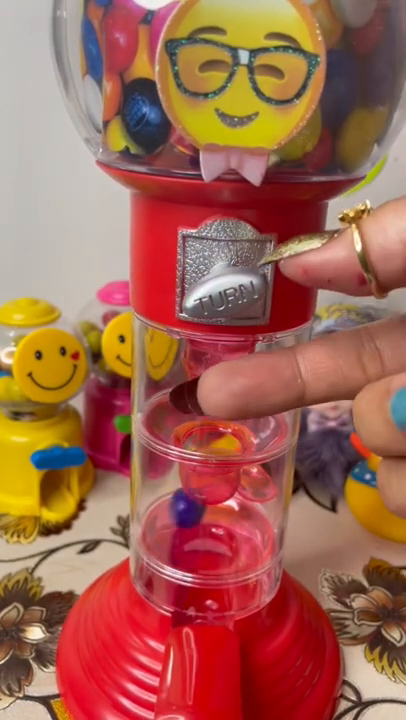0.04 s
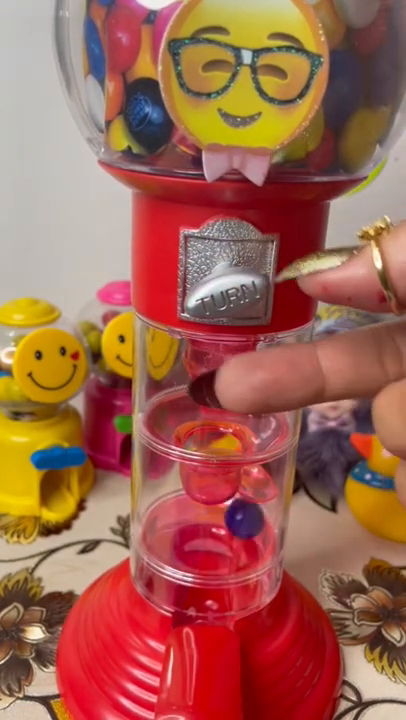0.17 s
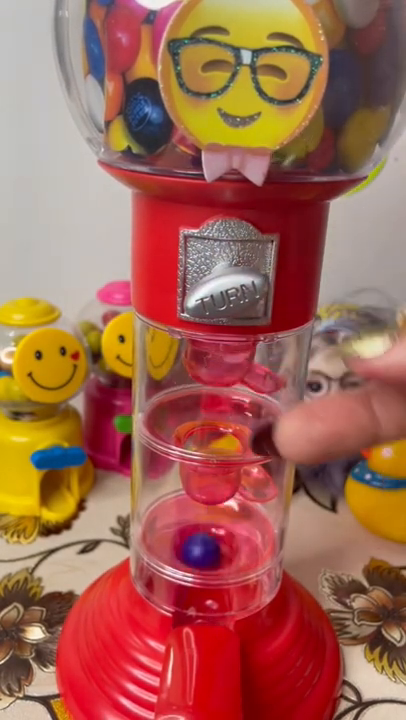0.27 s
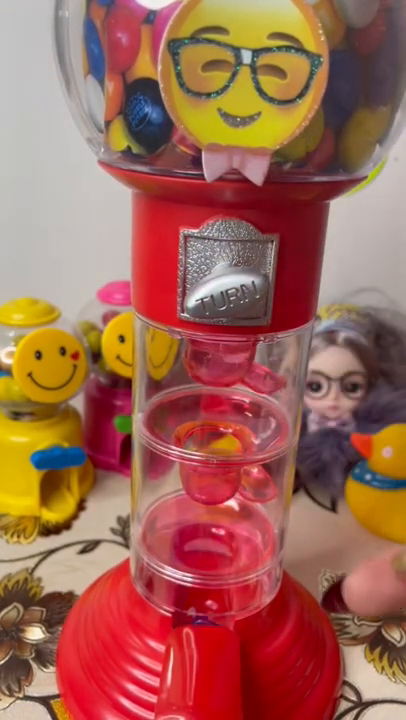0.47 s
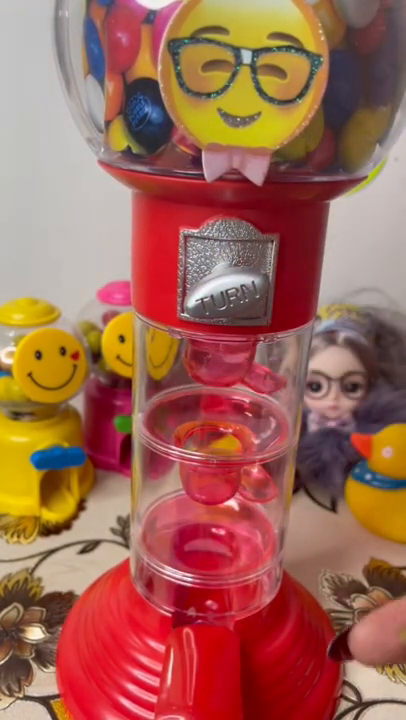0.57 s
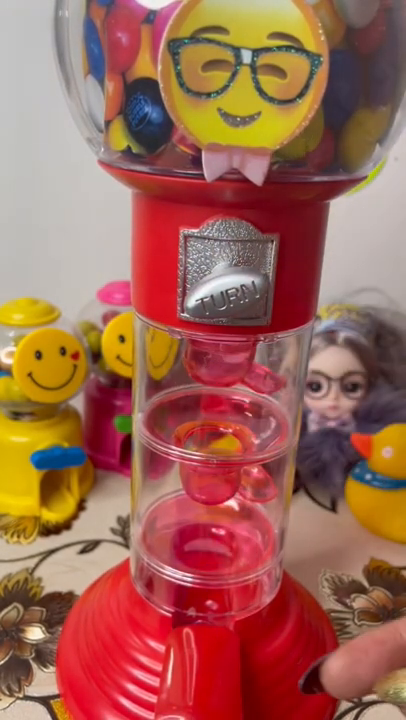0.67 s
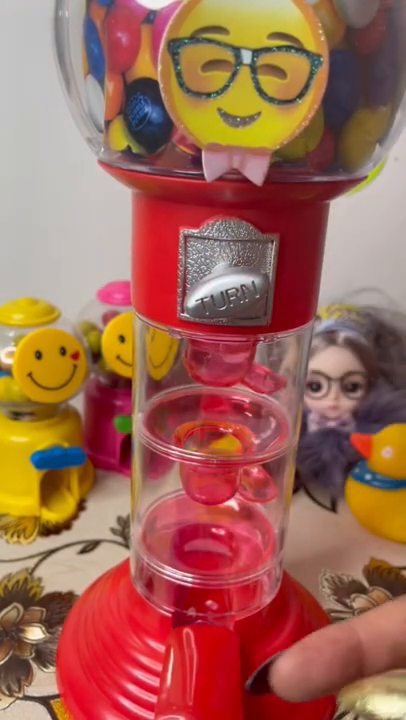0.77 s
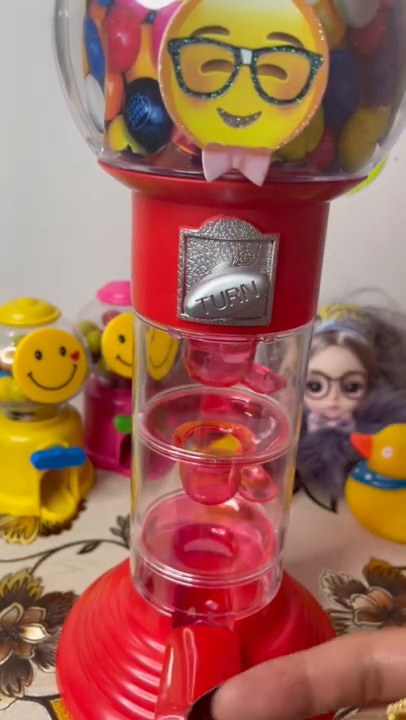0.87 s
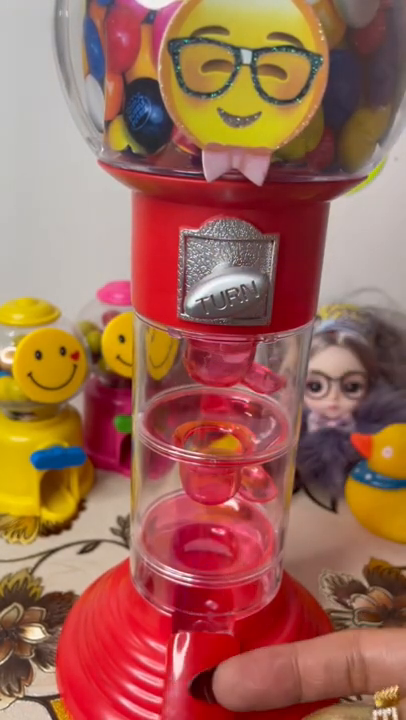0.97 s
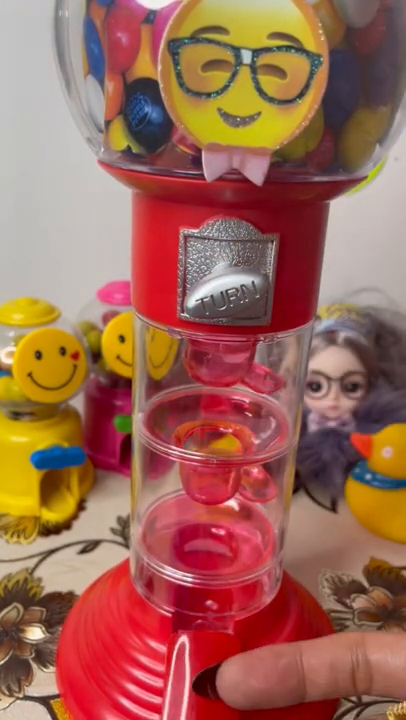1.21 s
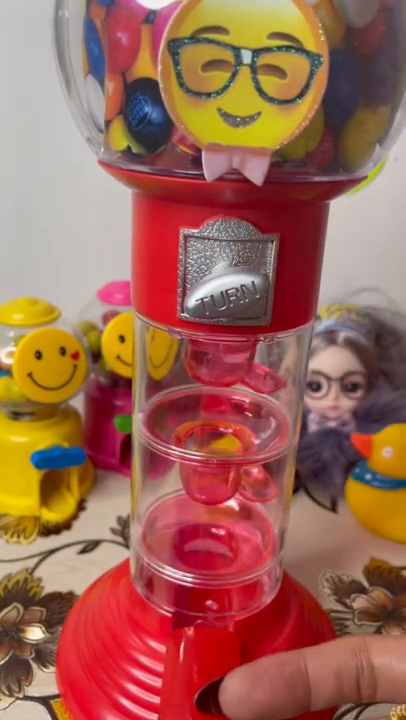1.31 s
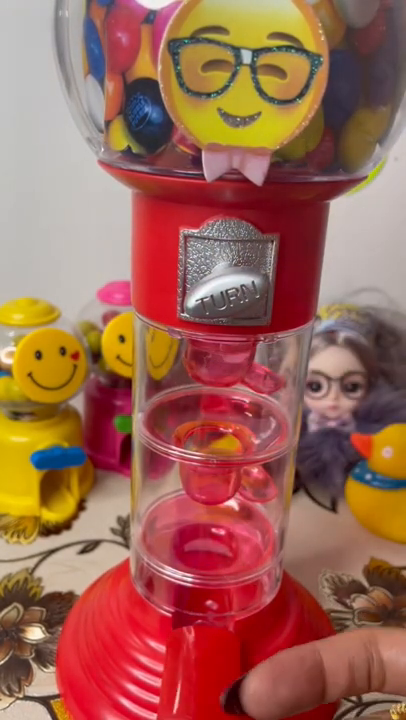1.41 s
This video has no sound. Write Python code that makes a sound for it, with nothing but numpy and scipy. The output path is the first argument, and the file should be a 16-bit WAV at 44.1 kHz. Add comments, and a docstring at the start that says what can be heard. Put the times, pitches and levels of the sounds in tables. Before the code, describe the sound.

A gumball knocks and bounces inside a plastic dispenser, followed by faint fingernail taps.

```python
"""A small quiet room with a low rumble, and a plastic toy machine heard close by two microphone ports.
A gumball rolls round the funnel, drops, bounces to rest and rattles on down the chute.
Every knock rings the thin shell, and the bumpy sugar coat gives the roll its grain.
Fingernails then click on the chute flap, skin rubs along it and a push sets it ringing."""
import sys
import numpy as np
from scipy import signal
from scipy.fft import rfft, irfft, next_fast_len
from scipy.io import wavfile
from scipy.ndimage import uniform_filter1d

SR = 44100
rng = np.random.default_rng(int(sys.argv[2]) if len(sys.argv) > 2 else 0)


def unload_wav(signal):
    """Save mono or channel-first audio to the path in sys.argv[1] as 16-bit WAV at rate SR, clipped to [-1, 1]."""
    wavfile.write(
        sys.argv[1],
        SR,
        np.round(np.clip(np.atleast_2d(signal).T, -1, 1) * 32767).astype(np.int16),
    )


N = 63945

# the snap of nail on plastic (frequency [Hz], level [dB per third octave], t60 [s])
FLAP_SNAP = [(150, -45, 0.044), (346, -22.5, 0.017), (830, -17, 0.051), (2000, -11, 0.016),
             (4000, -15, 0.032), (6170, -10.5, 0.0059), (8150, -9, 0.016), (9400, -7.5, 0.0046),
             (12900, -12.5, 0.0058), (14500, -25, 0.013), (16500, -17, .012)]
ATTACK_S, NAIL_ATTACK_S, RING_S = 0.00087, 0.00026, 0.15


def undb(db):
    """Decibels to gain."""
    return 10 ** (np.asarray(db) / 20)


def unit(x):
    """Scale to unit energy."""
    return x / np.sqrt(np.sum(x ** 2) + 1e-20)


def along(hz, points, column=1):
    """Read a column of a table on a log-frequency axis."""
    table = np.array(points, float)
    return np.interp(np.log(np.maximum(hz, 1)), np.log(table[:, 0]), table[:, column])


def shape(x, gain):
    """Filter by a gain that is a function of frequency."""
    size = next_fast_len(2 * x.shape[-1])
    spectrum = rfft(x, size) * gain(np.fft.rfftfreq(size, 1 / SR))
    return irfft(spectrum, size)[..., :x.shape[-1]]


def eq(x, curve):
    """Colour a sound with a curve of (frequency [Hz], gain [dB])."""
    return shape(x, lambda f: undb(along(f, curve)))


def coloured_noise(curve):
    """Steady noise at unit RMS, coloured by an EQ curve."""
    return unit(eq(rng.standard_normal(N), curve)) * np.sqrt(N)


def dying_bands(bands, t, tone):
    """Overtones too dense to count: third-octave noise bands, each dying at its own rate."""
    out = 0
    for hz in 125 * 2 ** (np.arange(22) / 3):
        noise = rng.standard_normal(2 * len(t))
        band = shape(noise, lambda f: 1 / (1 + (np.log2((f + 1) / hz) * 6) ** 8))[-len(t):]
        fade = np.exp(-np.log(1000) * t / along(hz, bands, column=2))
        out = out + unit(band * fade) * undb(along(hz, bands) + along(hz, tone))
    return out


def ring(modes, overtones, tone, attack_s):
    """One contact rings the plastic, a little differently at every spot and at each port."""
    # stereo width of the overtones (frequency [Hz], side against mid [dB])
    width = [(150, -21.5), (400, -21.5), (1800, -16.5), (4000, -9.5), (7000, -15.5), (12000, -14.5)]
    detune, scatter_db = 0.0077, 1.5
    t = np.arange(int(RING_S * SR)) / SR
    mid = dying_bands(overtones, t, tone)
    for hz, db, t60 in modes:
        pitch, strength = rng.standard_normal(2)
        wave = np.sin(2 * np.pi * hz * (1 + detune * pitch) * t) * np.exp(-np.log(1000) * t / t60)
        mid = mid + unit(wave) * undb(db + scatter_db * strength + along(hz, tone))
    side = eq(dying_bands(overtones, t, tone), width)
    return np.array([mid + side, mid - side]) * np.minimum(t / attack_s, 1)


def strikes(hits, modes, overtones, attack_s):
    """Single hits; the spot and hardness of each tilt its tone."""
    # EQ points for bass, mids, presence, lower treble and treble (frequency [Hz])
    tone_hz = [850, 1800, 4000, 6200, 10000]
    out = np.zeros((2, N))
    for start, db, bass, presence, treble in hits:
        tone = list(zip(tone_hz, [bass, 0, presence, (presence + treble) / 2, treble]))
        hit = ring(modes, overtones, tone, attack_s) * undb(db) * np.sqrt(.008 * SR)
        i = int(start * SR)
        out[:, i:i + hit.shape[-1]] += hit[:, :N - i]
    return out


def rolling(envelope, modes, overtones, tone):
    """The bumpy sugar coat taps the plastic in a dense stream; an envelope rides level and brightness."""
    taps_per_s, scatter_db, crossover_hz = 900, 5, 2600
    t = np.arange(N) / SR
    times, level_db, bright_db = np.array(envelope).T
    taps = (rng.random(N) < taps_per_s / SR) * rng.choice([-1, 1], N)
    taps = taps * undb(scatter_db * rng.standard_normal(N))
    running_rms = np.sqrt(uniform_filter1d(taps ** 2, size=600).clip(1e-6))
    taps = taps / running_rms * undb(np.interp(t, times, level_db)) * (t < times[-1])
    roll = signal.fftconvolve(taps[None], ring(modes, overtones, tone, ATTACK_S))[:, :N]
    body = shape(roll, lambda f: 1 / (1 + (f / crossover_hz) ** 4))
    return body + (roll - body) * undb(np.interp(t, times, bright_db))


def room_tone():
    """A bed of low rumble, alike at both ports, under a faint hiss that is wider above the bass."""
    # colour of the rumble (frequency [Hz], relative level [dB])
    rumble_colour = [(15, -38.5), (25, -7), (38, 0.5), (54, 2), (81, -6), (113, -5), (151, -15.5),
                     (189, -16), (250, -21), (320, -48.5), (550, -120)]
    # its slow swells (time [s], gain [dB])
    swells = [(0, 3), (0.249, -1.5), (.47, -3), (.6, 0.5), (.74, -4.5), (.88, -1), (1.06, -1), (1.2, -0.5),
              (1.45, 0.5)]
    # colour of the hiss (frequency [Hz], relative level [dB])
    hiss_colour = [(120, -36), (200, -3.5), (334, -9.5), (482, -11.5), (1040, -15.5), (1120, -15.5),
                   (1270, -15.5), (1370, -19), (2170, -20), (16000, -67.5)]
    # its stereo width (frequency [Hz], side against mid [dB])
    hiss_width = [(150, -21.5), (300, -13), (600, -4), (1100, 1), (1800, -10), (2800, -2.5), (5000, -2)]
    rumble_db, hiss_db = -45, -57.5
    side = eq(coloured_noise(hiss_colour), hiss_width) * np.array([[1], [-1]])
    swell_db = np.interp(np.arange(N) / SR, *np.array(swells).T)
    rumble = undb(rumble_db + swell_db) * coloured_noise(rumble_colour)
    return rumble + undb(hiss_db) * (coloured_noise(hiss_colour) + side)


def ball_in_funnel():
    """The gumball circles, drops and bounces to rest, ringing the thin shell at every contact."""
    # knocks on the shell (time [s], level [dB], bass [dB], presence [dB], treble [dB])
    knocks = [(.0275, -48, 4, 13, 14.5), (.0343, -33.5, -8.5, -4.5, -9), (.0523, -40.5, -7.5, 7.5, 11),
              (.1132, -47, 12.5, 7, 8), (.1825, -45.5, 5.5, -9, -13), (.1897, -49, 8, 3.5, -3),
              (.2028, -29.5, 1, -12, 0), (.2235, -34, 0, -12, 11), (.2315, -30, -4, -7.5, 4),
              (.2615, -17.5, 3, 9, 13), (.2712, -33.5, -4, 12.5, 8), (.3109, -27.5, -1, 16.5, -1),
              (.3277, -12.5, 1, -2, 3.5), (.3568, -33.5, -0.5, 9.5, 2), (.3728, -18, -0.5, -8.5, 0.5),
              (.3964, -23.5, -4.5, -11.5, 0), (.4110, -27.5, -0.5, -11, -2.5), (.4207, -31.5, -1, -10, -9),
              (.4280, -34.5, -0.5, -7, -8), (.4335, -54.5, 12, -17, 6), (.4835, -53, 6, -19, -14),
              (.5115, -46.5, 8.5, 4, 0), (.5502, -51, 9.5, 4, 1.5)]
    # resonances of the shell (frequency [Hz], level [dB], t60 [s])
    modes = [(865.6, -10.5, 0.041), (1106, -12, 0.032), (1513, -29, .035), (1542, -25, 0.06),
             (1715, -13.5, 0.048), (1788, -13.5, 0.039), (1831.4, -5.5, 0.03), (2177, -10.5, 0.014),
             (2926, -15.5, 0.047), (3660, -21.5, .028), (4364, -22.5, 0.023), (4620, -23, 0.065),
             (4760, -29.5, 0.14), (5314, -30.5, 0.068), (6190, -19.5, .035), (9476, -28.5, .015)]
    # its dense overtones (frequency [Hz], level [dB per third octave], t60 [s])
    overtones = [(150, -49, 0.15), (363, -34.5, 0.1), (600, -22, 0.04), (850, -19, 0.052),
                 (1160, -14.5, 0.024), (1900, -14.5, 0.033), (3500, -16.5, 0.027), (6200, -14.5, 0.03),
                 (7940, -15, 0.02), (9950, -21.5, 0.023), (12500, -27, 0.026), (14600, -30, 0.013),
                 (16500, -33, .015)]
    # the roll, brighter when the ball runs fast (time [s], level [dB], brightness [dB])
    roll = [(0, -49, -12.5), (0.059, -44.5, 9.5), (0.079, -44.5, 1.5), (.10, -49, -14), (.13, -50.5, -30),
            (.17, -56.5, -23), (.198, -44, -21), (0.206, -33, 3.5), (0.23, -30, 5.5), (.246, -56.5, 13),
            (.42, -55.5, 6), (.455, -72, -28), (.52, -52, -10), (.58, -63, -19.5)]
    # EQ of the roll (frequency [Hz], gain [dB])
    roll_tone = [(350, -5), (640, 12), (900, -0.5), (1800, -1.5), (4000, 0.5), (6200, -0.5), (7800, -6),
                 (10500, 2), (12500, -1.5), (14500, -15.5)]
    return strikes(knocks, modes, overtones, ATTACK_S) + rolling(roll, modes, overtones, roll_tone)


def ball_in_chute():
    """The gumball rattles down the chute and knocks against the flap; the chute rings."""
    # knocks on chute and flap (time [s], level [dB], bass [dB], presence [dB], treble [dB])
    knocks = [(.5960, -44.5, 2, -3, -3), (.6040, -37, 2.5, 2, 2), (.6080, -61, -2, -8, -4),
              (.6336, -31, -7.5, 2, 1), (.6425, -35.5, 6.5, -19, 5), (.6478, -36.5, -1, -4, -10),
              (.6525, -40, 6.5, 2, -4), (.6568, -40, 10, 9.5, 2), (.6685, -35.5, -11, 4.5, -0.5),
              (.6765, -40, -28, 4.5, -8), (.9843, -41, 3.5, -4, 5), (.9905, -40, 1, -13, -10),
              (.9960, -45, 2.5, 5, -3)]
    # resonances of the chute (frequency [Hz], level [dB], t60 [s])
    modes = [(590, -17, .04), (814, -14.5, 0.056), (1051, -11, 0.11), (1682, -8.5, 0.036),
             (1745, -10, 0.12), (1847, -11, 0.082), (1990, -17, 0.045), (2220, -16, .04),
             (2475, -18, 0.043), (2880, -7, 0.013)]
    # its dense overtones (frequency [Hz], level [dB per third octave], t60 [s])
    overtones = [(300, -35, .04), (900, -21, 0.013), (2400, -4.5, 0.045), (3400, -16, 0.043),
                 (4250, -18, 0.021), (6000, -16.5, .025), (10000, -27, 0.034), (16100, -30.5, 0.03)]
    # the roll down the chute (time [s], level [dB], brightness [dB])
    roll = [(.585, -69, 4), (.602, -40, -3), (.625, -50.5, -9), (.642, -48, 5), (.675, -39, -4),
            (.695, -49.5, -1), (.725, -76, -15)]
    # EQ of the roll (frequency [Hz], gain [dB])
    roll_tone = [(600, 7), (1100, 0.5), (1800, -8.5), (3200, 0), (10000, -3.5)]
    return strikes(knocks, modes, overtones, ATTACK_S) + rolling(roll, modes, overtones, roll_tone)


def nail_clicks():
    """Fingernails tick on the flap: all snap, too light to ring its modes."""
    # nail ticks (time [s], level [dB], bass [dB], presence [dB], treble [dB])
    clicks = [(.8417, -43, 4.5, 6.5, 6), (.8805, -57, 6, 11, 14), (.8876, -45, 6, -2, 8),
              (.8992, -64.5, 14, 8, 10), (1.0788, -38, -2.5, 2.5, -0.5), (1.1103, -54, 0, 0, 5),
              (1.2568, -47.5, -1.5, -5, -10), (1.3845, -61.5, 12, 3.5, -8)]
    return strikes(clicks, [], FLAP_SNAP, NAIL_ATTACK_S)


def skin_rubs():
    """Skin catches and slips on the plastic: brief swells of tiny ticks."""
    # strokes along the flap (time [s], length [s], level [dB])
    rubs = [(0.862, 0.046, -54.5), (.957, 0.043, -60.5), (1.083, 0.029, -56.5), (1.153, 0.034, -62.5)]
    # colour of the friction (frequency [Hz], relative level [dB])
    colour = [(300, 0), (1500, 5), (4000, -1.5), (6500, 0), (8000, -17), (10500, -1.5), (13000, -23),
              (16000, -23)]
    t = np.arange(N) / SR
    swell = sum(undb(db) * np.sin(np.pi * np.clip((t - start) / length, 0, 1))
                for start, length, db in rubs)
    ticks = rng.standard_normal((2, N)) * undb(2.9 * rng.standard_normal(N))
    return unit(eq(ticks, colour)) * np.sqrt(2 * N) * swell


def flap_pushes():
    """A finger pushes the flap and sets it ringing."""
    # pushes (time [s], level [dB], bass [dB], presence [dB], treble [dB])
    pushes = [(.8832, -47.5, 6, 2, 6), (.8878, -45.5, 9, -0.5, 0)]
    # resonances of the flap (frequency [Hz], level [dB], t60 [s])
    modes = [(328, -11, 0.049), (550, -8.5, 0.081), (750, -6.5, 0.063), (1143, -9.5, 0.037),
             (1710, -5.5, 0.043), (3160, -4, 0.028), (3764, -2.5, 0.031), (5250, -8.5, .035)]
    return strikes(pushes, modes, FLAP_SNAP, ATTACK_S)


def at_ports(x):
    """The direct sound reaches the two ports out of step."""
    # lead of the left port over the right (frequency [Hz], phase [rad])
    lead = [(60, 1), (200, 0.4), (400, 0.5), (750, 0.32), (1200, 0.67), (1800, 0), (2400, 1.06),
            (2950, 0.95), (3600, 0.53), (4500, 1.9), (5300, 0.76), (6500, 2), (7800, 3), (9200, 4.5),
            (10400, 6), (11600, 5.5), (13000, 8.5), (14200, 10), (15700, 10)]
    return shape(x, lambda f: np.exp(.5j * along(f, lead) * np.array([[1], [-1]])))


def room_tail(x):
    """The small room adds a short, weak reverb, different at each port."""
    # reverb bands (frequency [Hz], level before the tilt [dB per third octave], t60 [s])
    bands = [(199, -16.5, 0.26), (900, -18, 0.34), (1960, -18.5, 0.19), (4700, -7, 0.092),
             (8000, -28.5, .17), (11000, -14.5, 0.19), (14000, -21.5, .15)]
    white_tilt = [(125, -28.8), (16000, -7.7)]  # (frequency [Hz], gain [dB])
    length_s, onset_s = .4, .005
    t = np.arange(int(length_s * SR)) / SR
    tails = np.array([dying_bands(bands, t, white_tilt) for _ in range(2)]) * np.minimum(t / onset_s, 1)
    return signal.fftconvolve(x.mean(axis=0)[None], tails)[:, :N]


def scene():
    """Ball and fingers on the machine, close up, over reverb and room tone."""
    toy = ball_in_funnel() + ball_in_chute() + flap_pushes() + nail_clicks() + skin_rubs()
    return at_ports(toy) + room_tail(toy) + room_tone()


def record(dry):
    """The treble takes on a slight colour; the recorder cuts the deepest bass and the top."""
    # colour of the treble (frequency [Hz], gain [dB])
    treble_colour = [(6000, 0), (7000, -1.5), (8000, -5.5), (9400, 3), (11000, -1), (12500, -1.5),
                     (14000, -3.5), (15600, 3.5), (16100, -2)]
    low_cut_hz, high_cut_hz = 38, 16300
    x = eq(dry, treble_colour)
    x = signal.sosfilt(signal.butter(8, low_cut_hz, "high", fs=SR, output="sos"), x)
    return signal.sosfilt(signal.ellip(8, .2, 80, high_cut_hz, fs=SR, output="sos"), x)


dry = scene()
out = record(dry)
unload_wav(out)
```